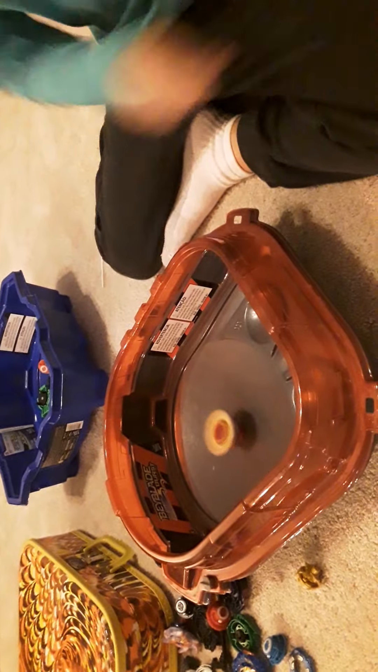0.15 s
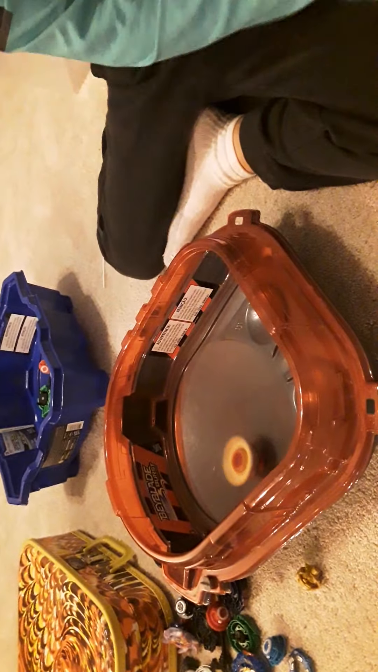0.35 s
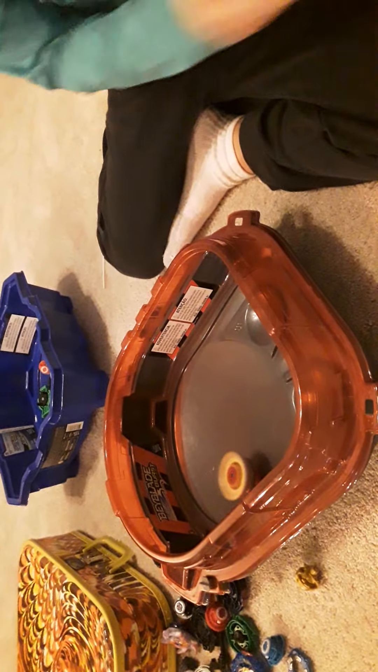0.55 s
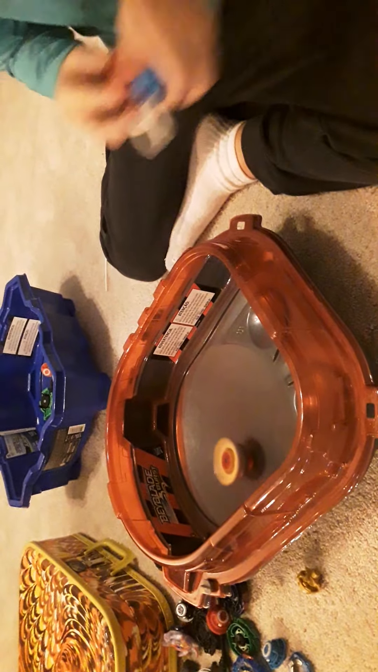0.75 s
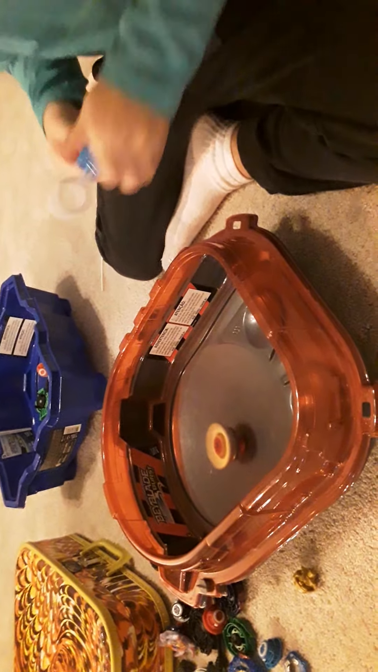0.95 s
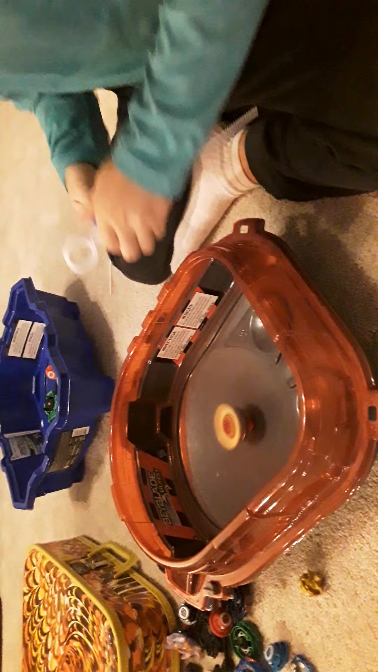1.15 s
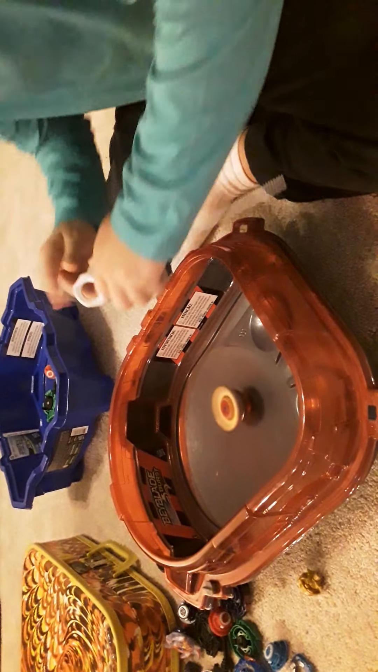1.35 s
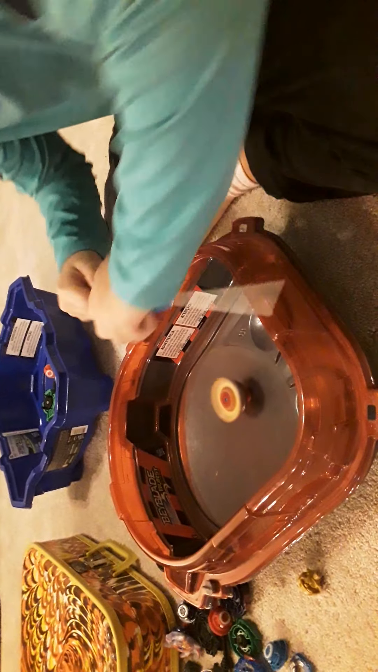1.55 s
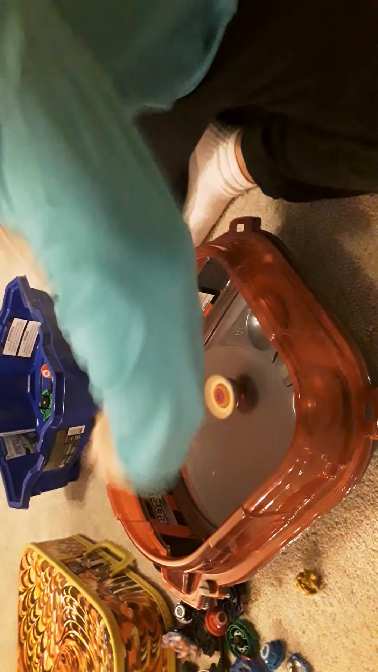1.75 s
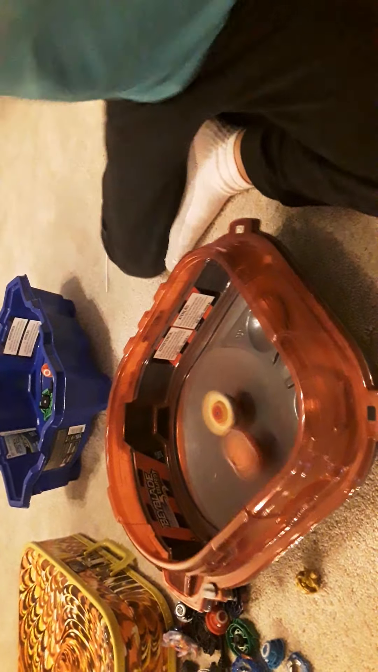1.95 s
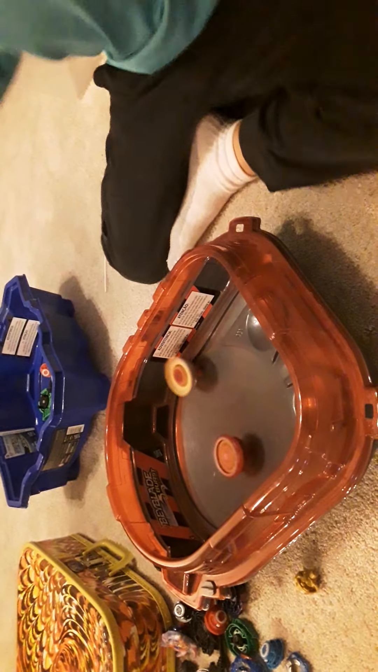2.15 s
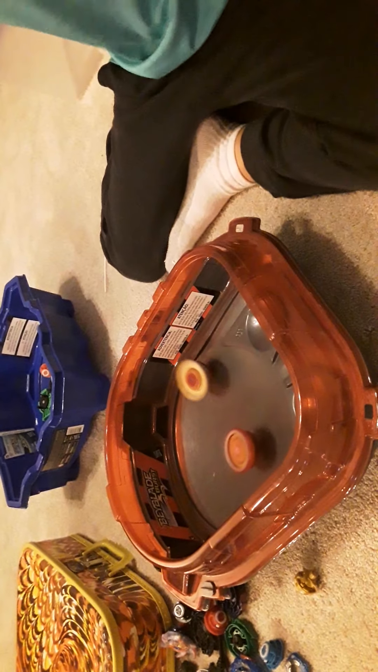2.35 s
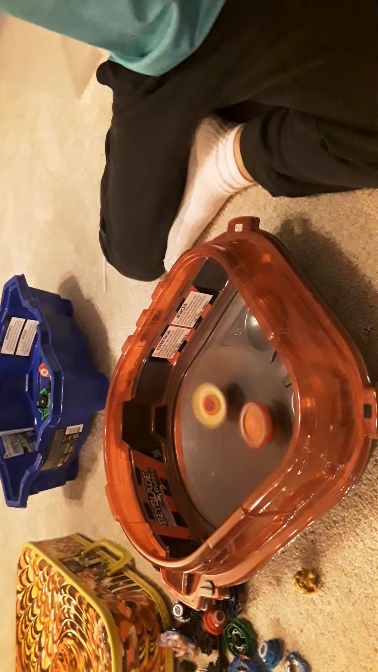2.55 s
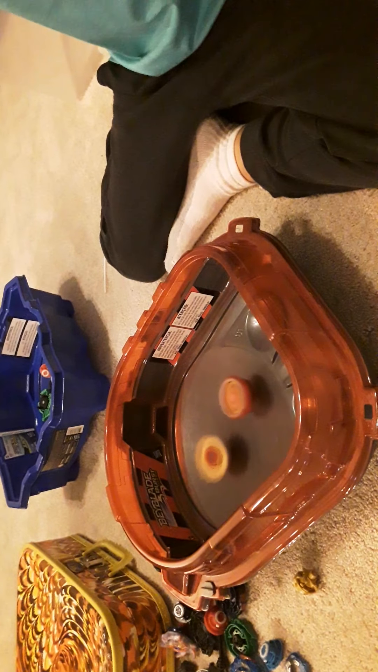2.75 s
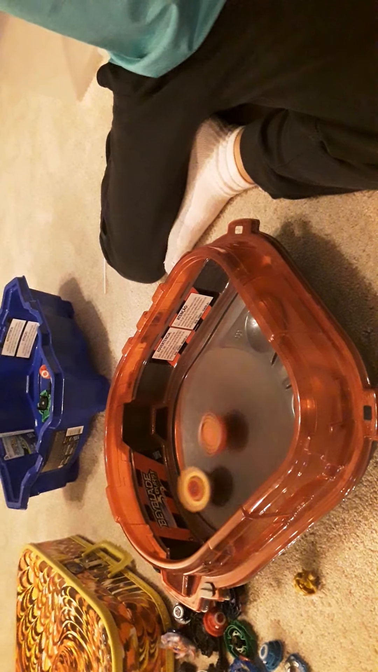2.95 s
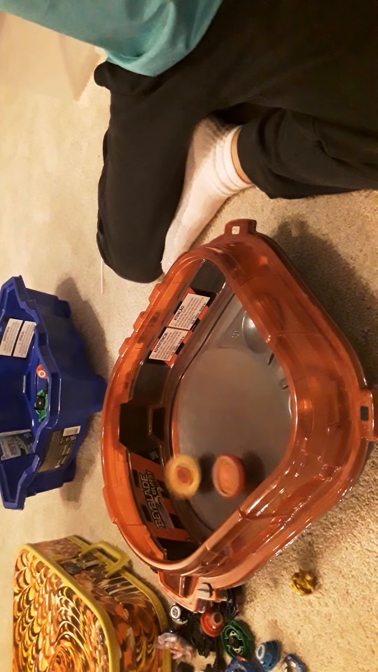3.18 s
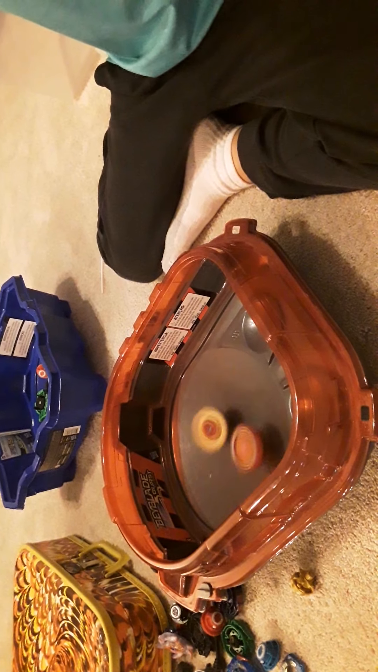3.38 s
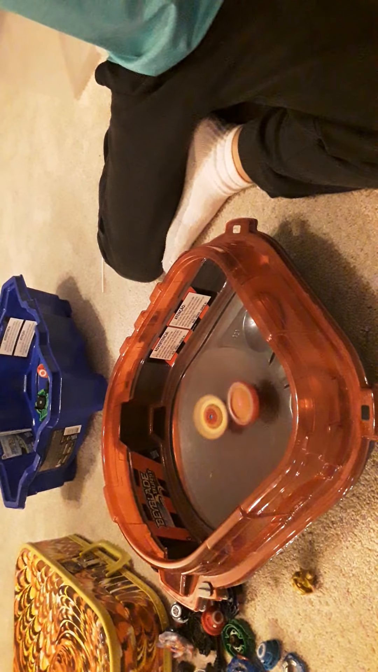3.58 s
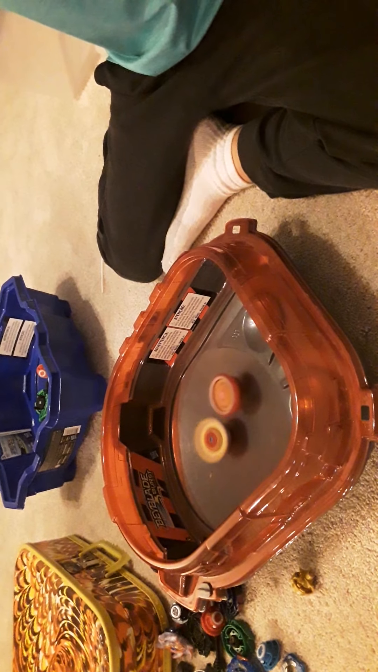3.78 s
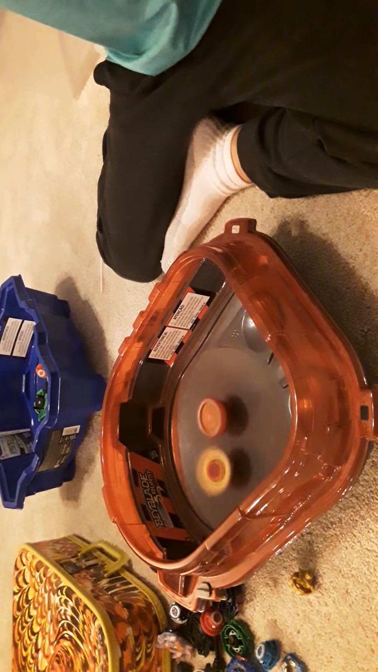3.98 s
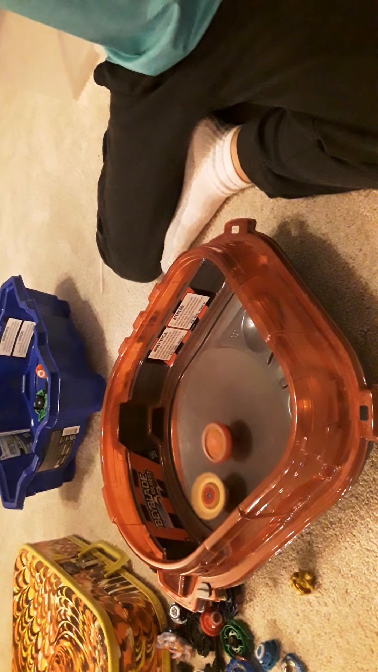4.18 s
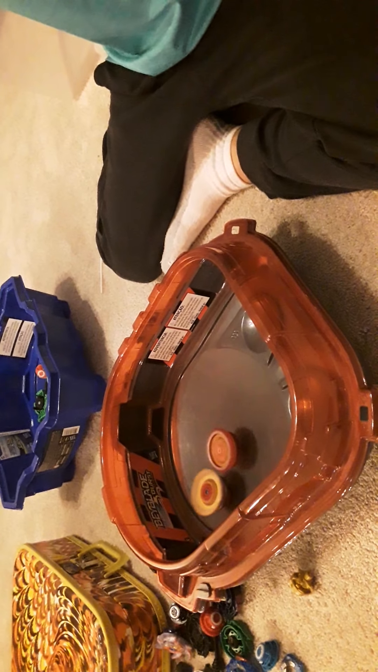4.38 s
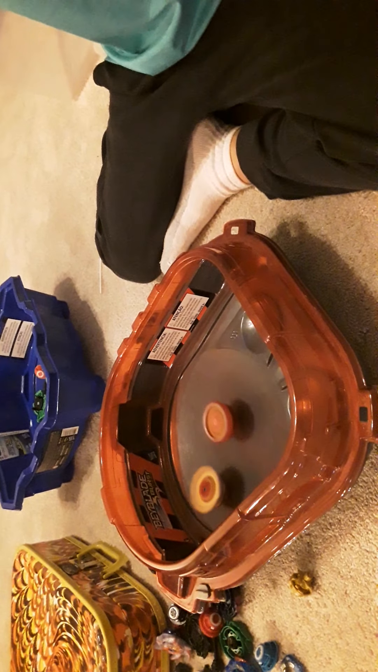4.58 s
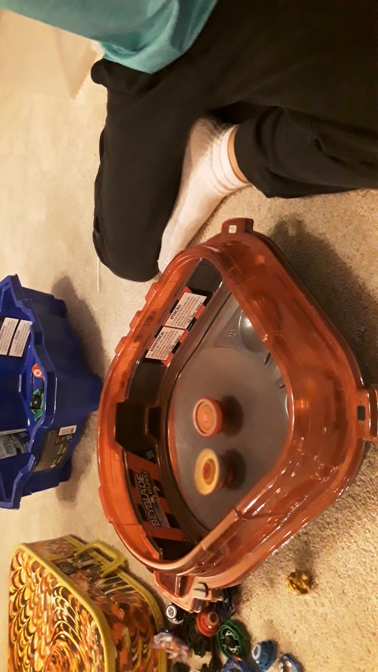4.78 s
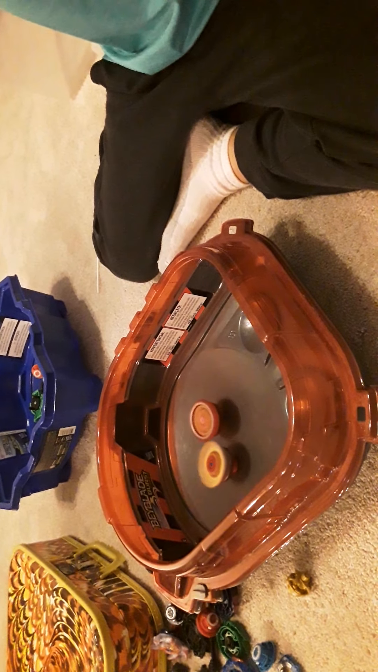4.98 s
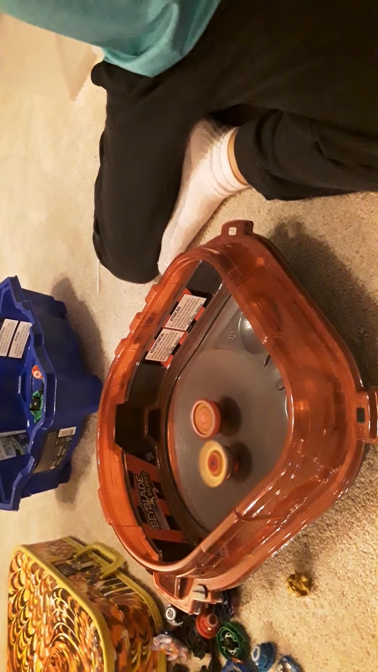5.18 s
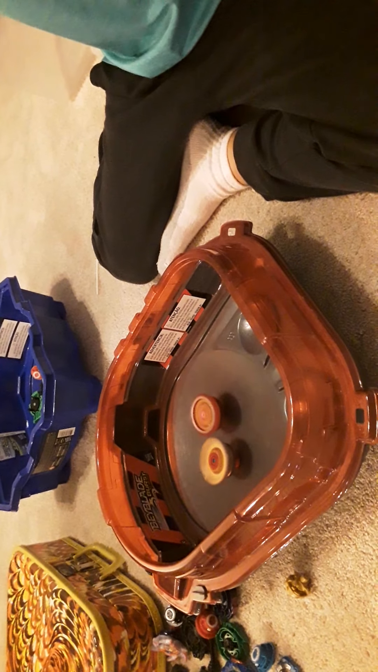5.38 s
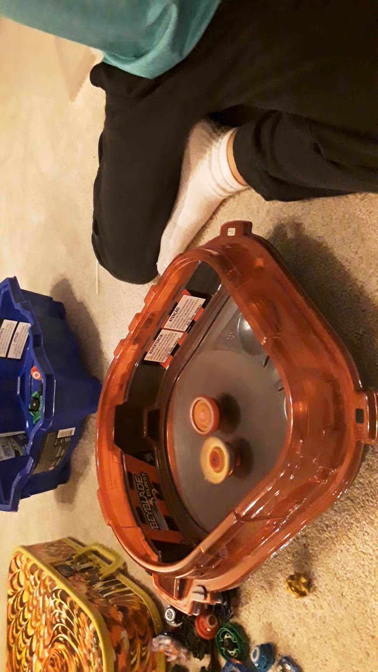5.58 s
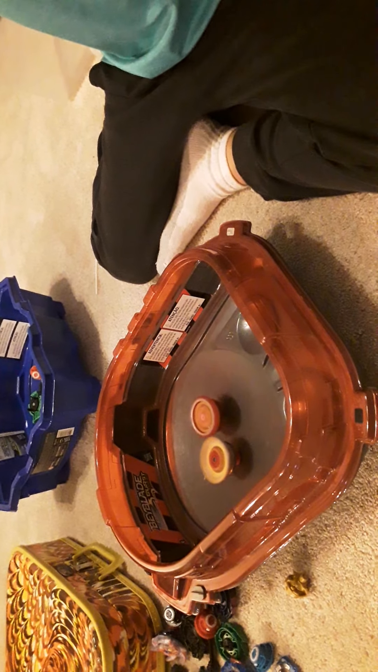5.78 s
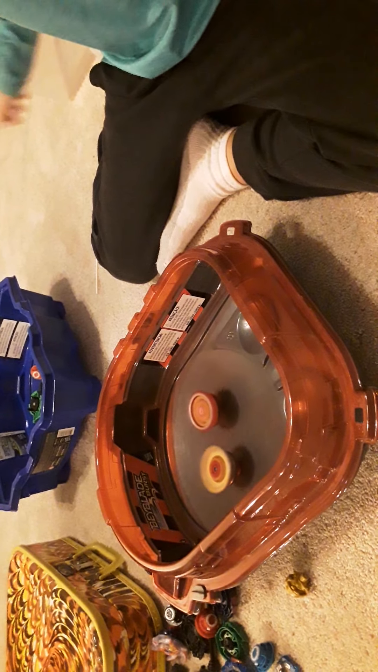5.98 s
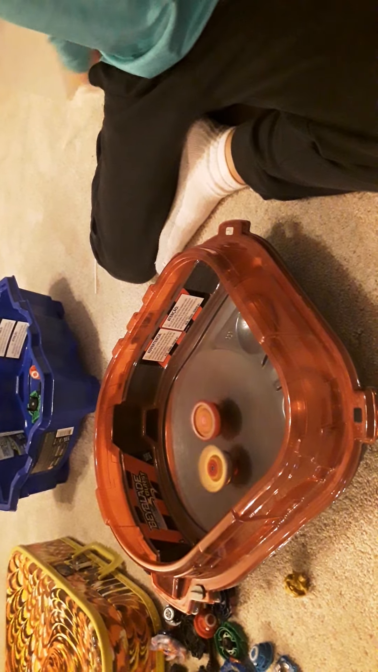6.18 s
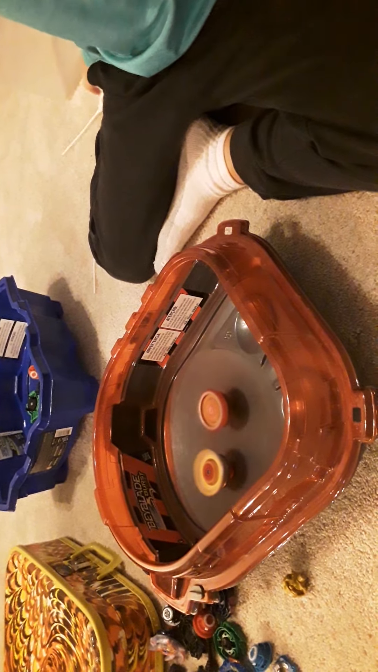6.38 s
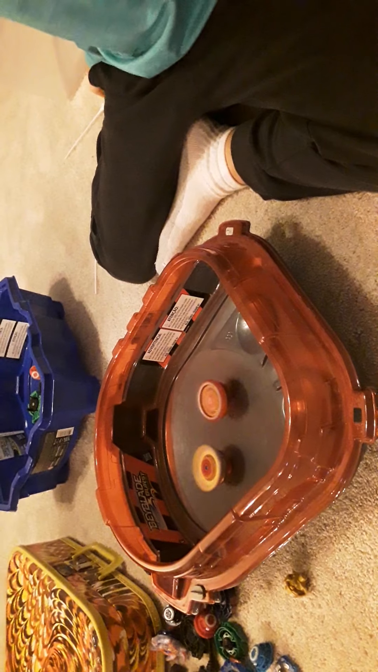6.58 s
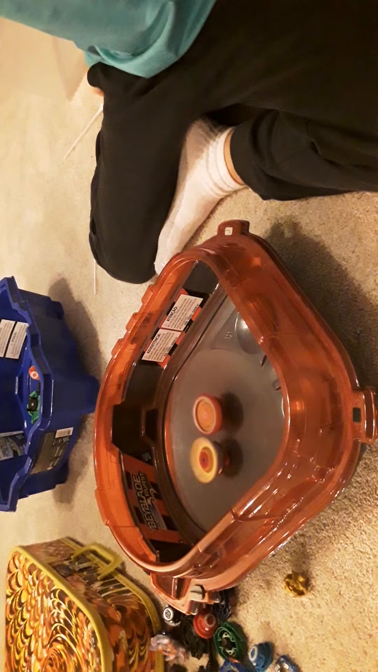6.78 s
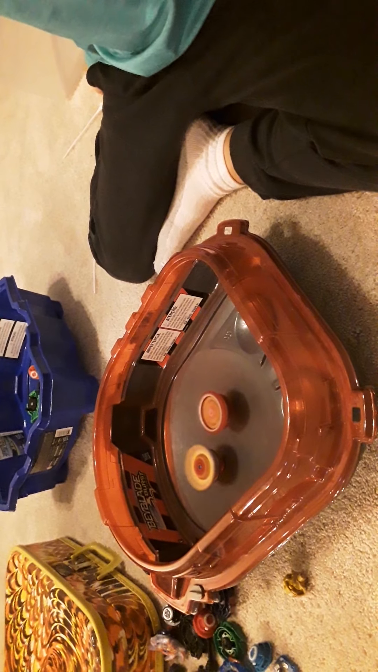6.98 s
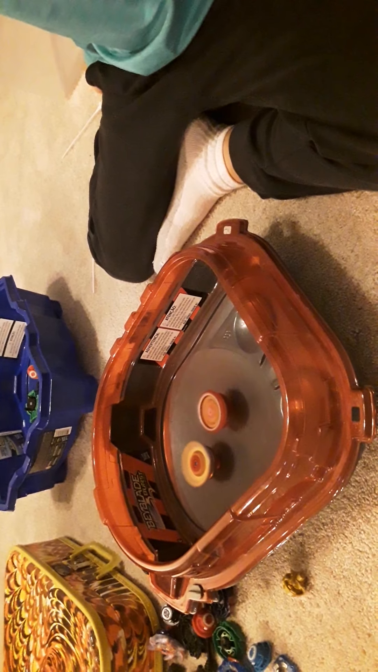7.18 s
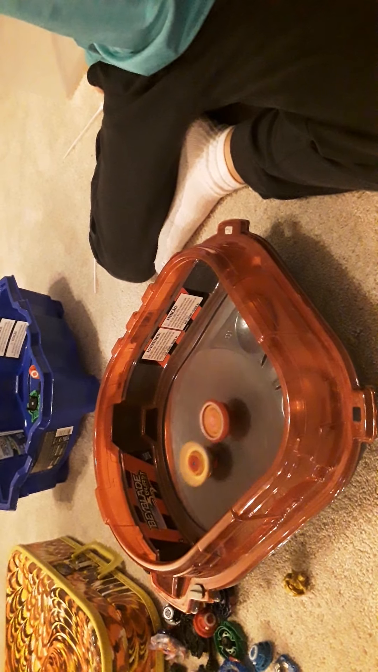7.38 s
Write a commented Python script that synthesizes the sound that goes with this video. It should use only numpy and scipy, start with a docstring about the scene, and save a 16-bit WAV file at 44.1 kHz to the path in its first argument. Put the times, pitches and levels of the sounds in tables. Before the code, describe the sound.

A toy top hums in a plastic bowl, then a launcher zips and a second top drops in, clashing sharply as both slow.

```python
"""In a small carpeted room, two toy spinning tops battle in a thin plastic arena, heard from above.
One top hums, rolls and ticks as its leaning rim touches down. The second is clicked onto a launcher,
spun up with a toothed rip cord and dropped in. The tops rattle along the wall and clash, more and more
rarely as they slow. The arena and the room ring after each clack."""
import sys
import numpy as np
from scipy import signal
from scipy.fft import rfft, irfft
from scipy.io import wavfile
from scipy.ndimage import uniform_filter1d

SR = 44100
rng = np.random.default_rng(int(sys.argv[2]) if len(sys.argv) > 2 else 0)


def wav_out(sig):
    """Save sig, one row per channel (or a flat mono array), as 16-bit PCM at SR to the path in sys.argv[1]."""
    wavfile.write(sys.argv[1], SR, np.round(np.clip(np.atleast_2d(sig).T, -1, 1) * 32767).astype(np.int16))


N = 327646
T = np.arange(N) / SR  # time of each sample [s]

# Levels in all tables are relative. Tilt adds treble, in dB per decade (a tenfold rise in pitch).
# the second top landing and bouncing: (time [s], level [dB], tilt [dB/decade], chatter [ms])
LANDING_BLOWS = [(1.9248, -9.5, 10, 8.5), (1.935, -21.5, -23.5, 3.2), (1.953, -16.5, -9, 4.7)]
# the tops hitting each other or the wall: (time [s], level [dB], tilt [dB/decade], chatter [ms])
CLASH_BLOWS = [(2.0216, 4, -3.5, 6.7), (2.658, -20.5, 7, 1.6), (2.75, -16.5, 0, 5), (2.824, -13.5, -0.5, 5),
               (2.835, -16, 6, 2.1), (3.037, -17.5, 5, 4.5), (3.0737, -2, -3, 3.9),
               (3.0812, 4.5, -2.5, 8.9), (3.173, -20, 6, 3), (3.2004, -8, -6, 2),
               (3.5575, -9.5, -2.5, 11.5), (3.5689, -6, -6, 4.7), (3.9854, -5.5, -2, 5.1),
               (4.107, -21.5, -11, 6.3), (4.4304, -9.5, -4.5, 7.3), (4.4596, -5.5, 0.5, 5),
               (4.4716, -3.5, -3.5, 7.9), (4.9116, -6.5, -4.5, 6.2), (4.9269, -16.5, -10, 18.5),
               (5.0251, -20, 0, 2.7), (5.037, -6, -3.5, 7.8), (5.054, -8, -2, 4.9), (5.0921, -15, -3, 4.8),
               (5.1765, -9.5, -2.5, 6.6), (5.236, -9, -0.5, 6.8), (5.3633, -10.5, -0.5, 6.9),
               (5.6088, -9, -4, 5.7), (5.839, -12, 1, 4.9), (5.852, -2.5, -5, 4.65), (6.2965, -19, -2, 4.2),
               (6.305, -4.5, -6.5, 3.04), (6.8555, -5, -7, 2.44), (7.413, -11, -3, 3.2)]
# tone of plastic rolling or shifting on plastic: (frequency [Hz], level [dB])
ROLL_TONE = [(60, -28), (130, -3), (230, -0.5), (400, -7.5), (800, -5), (1400, -7.5), (2700, -13.5),
             (4000, -17.5), (8500, -19.5), (15500, -46)]
# tone of the launcher's gears: (frequency [Hz], level [dB])
GEAR_TONE = [(88, -43.5), (150, -18), (341, -19), (494, -18.5), (689, -18.5), (774, -10.5), (979, -21.5),
             (4080, -16), (7770, -1), (11900, -12), (16000, -33.5)]
# tone of a top dropping on the dish, the arena's floor: (frequency [Hz], level [dB])
LANDING_TONE = [(80, -29), (200, -2), (420, -1.5), (620, -4), (802, 4), (950, -4.5), (1100, 0), (1400, -5),
                (2100, -7.5), (2650, -9), (4400, -18), (8200, -15.5), (16000, -38)]
# notes at which the launcher's body rings: (pitch [Hz], width [Hz], level [dB])
LAUNCHER_NOTES = [(2870, 150, 1.5), (5120, 410, -1.5), (8340, 180, -5.5)]


def undb(db):
    """Turn decibels into a factor to multiply by."""
    return 10 ** (np.asarray(db) / 20)


def unit(x):
    """Scale a signal to an average power of 1."""
    return x / np.sqrt(np.mean(x ** 2) + 1e-18)


def curve(rows, column=1):
    """One column of a table, joined by straight lines in time."""
    rows = np.array(rows)
    return np.interp(T, rows[:, 0], rows[:, column])


def add(out, start, x):
    """Mix x into out from a start time in seconds."""
    i = int(np.clip(start * SR, 0, N - 1))
    out[i:i + len(x)] += x[:N - i]


def swell(start, rise, fall, db, depth_db):
    """A gain that arches up by depth_db to a crest and down again, silent outside."""
    from_crest = T - start - rise
    away = np.where(from_crest < 0, -from_crest / max(rise, 1e-3), from_crest / max(fall, 1e-3))
    return (away <= 1) * undb(db - depth_db * np.minimum(away, 1) ** 2)


def colour(x, tone, tilt_db=0, size=2048):
    """Filter x to follow a tone table; white noise would keep its power."""
    hz, db = np.transpose(tone)
    decades = np.log10(np.maximum(np.fft.rfftfreq(size, 1 / SR), 10))
    gains = undb(np.interp(decades, np.log10(hz), db) + tilt_db * decades)
    # folding the second half onto the first makes the filter ring only after a hit
    cepstrum = irfft(np.log(gains))
    cepstrum[1:size // 2] *= 2
    cepstrum[size // 2 + 1:] = 0
    response = irfft(np.exp(rfft(cepstrum)))
    return signal.fftconvolve(x, response / np.linalg.norm(response))[:len(x)]


def resonate(x, notes):
    """An object shaken by x rings at its own notes; narrow ones ring longest."""
    return sum(undb(db) * signal.lfilter(*signal.iirpeak(hz, hz / width, fs=SR), x)
               for hz, width, db in notes)


def reflections(split_hz=9000):
    """Quick echoes from the arena and floor, then a short room tail whose treble dies first."""
    t = T[:SR // 2]

    def tail(noise, delay_s, fade_s):
        """Noise that starts after a delay and drops 60 dB in fade_s."""
        shape = (t > delay_s) * np.exp(-np.log(1000) * t / fade_s)
        return noise * shape / np.linalg.norm(shape)

    near, far = rng.standard_normal((2, len(t)))
    walls = np.arange(0, t[-1], .0015)  # the first echoes come in clumps, wall by wall
    near = unit(near * undb(4 * np.interp(t, walls, rng.standard_normal(len(walls)))))
    low = signal.sosfiltfilt(signal.butter(2, split_hz, fs=SR, output="sos"), far)
    room_tail = tail(low, .0083, fade_s=.53) + tail(far - low, .0083, fade_s=.2)
    return undb(-8) * (tail(near, .0059, fade_s=.17) + room_tail)


def room(x, echo_db):
    """A sound together with its echoes."""
    return x + undb(echo_db) * signal.fftconvolve(x, reflections())[:N]


def grit(per_s, spread_db):
    """Many tiny contacts of uneven size, at random times."""
    sizes = rng.choice([-1, 1], N) * undb(spread_db * rng.standard_normal(N))
    return unit(sizes * (rng.random(N) < per_s / SR))


def clacks(rows, tone, gain_db, attack_s, loose, loose_s, echo_db, uneven_db=3):
    """Each blow makes loose parts chatter briefly; it lands on a new spot, so it has its own echoes."""
    out, t = np.zeros(N), T[:SR // 2]
    contacts = np.arange(0, t[-1], .0008)
    for start, db, tilt_db, chatter_ms in rows:
        length = max(chatter_ms, .5) / 1000
        fade = np.exp(-(t / length) ** 3) + loose * np.exp(-t / loose_s)
        # the first contact has its full force; the rebounds after it vary
        scatter = np.interp(t, contacts, rng.standard_normal(len(contacts)))
        rebounds = undb(uneven_db * scatter * np.minimum(t / length, 1))
        burst = fade * (1 - np.exp(-t / attack_s)) * rebounds * rng.choice([-1, 1], len(t))
        echoes = undb(echo_db) * np.linalg.norm(burst) * reflections()
        add(out, start, undb(db + gain_db) * colour(burst + echoes, tone, tilt_db))
    return out


def rattles(rows, tone, per_s, gain_db, click_s=.0022):
    """Parts touch again and again in bursts of quick, uneven clicks."""
    out = np.zeros(N)
    for start, length, db in rows:
        t = np.arange(int((length + .008) * SR)) / SR
        gaps, sizes = rng.uniform(.6, 1.4, size=40), undb(3.5 * rng.standard_normal(40))
        times = (np.cumsum(gaps) - gaps[0]) / per_s
        clicks = sum(size * (t >= at) * np.exp(-abs(t - at) / click_s)
                     for at, size in zip(times, sizes) if at <= length)
        add(out, start, undb(db + gain_db) * unit(clicks) * np.sqrt(length * SR / len(t)))
    return colour(out * rng.choice([-1, 1], N), tone)


def spin(turns_per_s, since_s, drag=.0021):
    """A top's turns per second: air drag makes one turn take `drag` seconds longer every second."""
    return 1 / (1 / turns_per_s + drag * (T - since_s))


def room_air():
    """The quiet room's faint, steady rumble and hiss."""
    # tone of the background: (frequency [Hz], level [dB])
    tone = [(25, -26.5), (110, 9), (1000, -27.5), (4000, -30.5), (8000, -22), (15000, -48)]
    return undb(-67.5) * colour(rng.standard_normal(N), tone)


def rolling(speed, settle_s=4.77, fade_db_per_s=5.5, throb=.07):
    """The tips grind over the dish, throbbing twice a turn, and fade as the tops settle in the middle."""
    # a top swings out over the slope and rumbles louder: (time [s], rise [s], fall [s], level [dB])
    swings = [(-.2, 0.28, 0.06, -48), (.08, 0.14, 0.95, -42.5), (1.399, 0.15, 0.36, -56.5),
              (1.95, 0.12, 0.47, -39.5), (2.45, 0.35, 1, -38.5), (3.5, 0.34, 1, -49.5),
              (4.35, 0.11, 0.96, -51)]
    even_roll = undb(-67 - fade_db_per_s * np.maximum(T - settle_s, 0))
    swing_power = sum(swell(*swing, depth_db=31) ** 2 for swing in swings)
    strength = undb(-2) * np.sqrt(even_roll ** 2 + swing_power)
    turns = np.cumsum(speed) / SR
    grind = grit(per_s=1400, spread_db=4.3) * (1 + throb * np.cos(4 * np.pi * turns))
    return colour(grind * strength, ROLL_TONE)


def humming():
    """A wobble shakes the dish twice a turn; the uneven dish makes the hum waver, high notes most."""
    # hum of whichever top wobbles most, at twice its spin: (time [s], pitch [Hz], level [dB])
    wobble = [(.15, 100.9, -52.5), (.33, 110.7, -43.5), (1.1, 97.7, -55), (1.7, 92.7, -54),
              (2.3, 89.5, -54.5), (2.5, 96, -54.5), (2.8, 90, -40.5), (3.4, 84.8, -59), (4.6, 73.7, -61.5),
              (7.4, 59.1, -77.5)]
    # the notes in that hum: (multiple of the spin, level [dB])
    partials = [(2, 2), (3, -10), (4, -7), (6, -9.5), (8, -14)]
    turns = np.cumsum(curve(wobble) / 2) / SR
    knots = np.arange(0, T[-1], .05)
    hum = 0
    for multiple, db in partials:
        real, imag = (np.interp(T, knots, row) for row in rng.standard_normal((2, len(knots))))
        waver = 1 + .25 * multiple * (real + 1j * imag)  # nudges both level and pitch
        note = np.exp(2j * np.pi * (multiple * turns + rng.random()))
        hum = hum + undb(db) * unit(np.real(waver * note))
    return unit(hum) * undb(curve(wobble, column=2))


def rim_ticks(speeds, contact_s=.0033, far_side_db=-13, scatter_db=1.5):
    """A leaning rim touches once a turn, its far side more weakly; a slow top gives a thin whirr."""
    # a top leans for a while: (time [s], which top, rise [s], fall [s], level [dB])
    leans = [(0.015, "first", 0.00089, 0.081, -47.5), (0.1486, "first", 0.07, 0.03, -49),
             (0.243, "first", 0.053, 0.18, -31), (.4555, "first", 0.0087, 0.46, -35),
             (1.165, "first", 0.036, 0.13, -48.5), (1.448, "first", 0.26, .03, -52),
             (2.169, "first", 0.061, 0.051, -45.5), (2.3743, "first", 0.0033, 0.13, -49.5),
             (2.492, "first", 0.33, 0.027, -42), (2.991, "second", 0.032, 0.12, -35.5),
             (3.458, "first", 0.0011, 0.11, -43), (3.789, "first", 0.1, 0.082, -46.5),
             (4.221, "second", 0.017, 0.28, -56), (4.653, "second", 0.037, 0.13, -49.5),
             (4.705, "second", 0.06, 0.19, -50.5), (6.083, "first", 0.0063, 0.38, -64),
             (6.525, "first", 0.087, 0.17, -59)]
    # tone of a fast top's tick: (frequency [Hz], level [dB])
    tone = [(1000, -29.5), (3000, -19), (6000, -20.5), (7900, -5), (8700, -8), (9600, -3), (10800, -14),
            (15500, -37)]
    # thin ringing of a slow top's rim: (pitch [Hz], width [Hz], level [dB])
    whirr_notes = [(2850, 130, 0), (7150, 150, 14.5), (7767, 91, 19.5), (10400, 400, 2.5)]
    hard, soft = np.zeros((2, N))
    for start, top, rise, fall, db in leans:
        speed = speeds[top]
        turns = np.cumsum(speed * (T >= start)) / SR
        sizes = undb(scatter_db * rng.standard_normal(1000) + far_side_db * (np.arange(1000) % 2))
        touches = np.exp(-(turns % .5 / speed / contact_s) ** 2) / np.sqrt(speed * contact_s / 2)
        ticks = sizes[(2 * turns).astype(int)] * touches * swell(start, rise, fall, db, depth_db=14.5)
        hardness = np.interp(speed, [31, 37], [0, 1])  # all whirr below 31 turns a second
        hard += ticks * hardness
        soft += ticks * (1 - hardness)
    grain = rng.choice([-1, 1], N)
    lowpass = signal.butter(4, 11000, fs=SR, output="sos")
    whirr = signal.sosfilt(lowpass, resonate(soft * grain, whirr_notes))
    return colour(hard * grain, tone) + undb(-1) * whirr


def snapping():
    """The launcher's catch clicks, or a rim nicks the wall: sharp plastic snaps that ring briefly."""
    # the snaps: (time [s], level [dB], tilt [dB/decade], chatter [ms])
    blows = [(0.0536, -21.5, 24, 6.4), (0.2448, -3.5, 10, 4.8), (0.9672, 5, 29, 2.8),
             (0.9975, -1.5, 23.5, 9.9), (1.0307, 7.5, 18.5, 2.15), (1.0802, 4, 10, 3.97),
             (1.257, -24, 11, 4.6), (1.684, -18, 2.5, 7.3), (1.7575, -2.5, 10, 2.6), (1.7932, 13, 35, 0.9)]
    # tone of a snap: (frequency [Hz], level [dB])
    tone = [(120, -56.5), (200, -16.5), (409, -21.5), (465, -36.5), (821, -9.5), (1350, -23), (2910, -2.5),
            (3490, -10.5), (5500, -5.5), (7300, -0.5), (8300, -1), (10100, -16), (11700, -11), (16000, -34)]
    snaps = clacks(blows, tone, gain_db=-12.5, attack_s=.0012, loose=.22, loose_s=.004, echo_db=-2.5)
    return snaps + resonate(snaps, LAUNCHER_NOTES)


def rubbing():
    """The first top slides along the slope, plastic on plastic: a fine, gritty hiss."""
    # strength of the rub: (time [s], level [dB])
    rub = [(.23, -81), (.25, -41.5), (.42, -36), (.6, -41), (.8, -47.5), (.88, -75.5)]
    # tone of the hiss: (frequency [Hz], level [dB])
    tone = [(880, -69), (1500, 5.5), (3500, -6.5), (5540, 7), (9600, 1.5), (13500, -10), (16000, -34)]
    touching = uniform_filter1d(1. * ((T > rub[0][0]) & (T < rub[-1][0])), size=600)
    return colour(grit(per_s=5000, spread_db=2.5) * touching * undb(curve(rub) - 1), tone)


def fingers():
    """Fingers shift on the hollow launcher and make it rattle softly."""
    # finger movements: (time [s], length [s], level [dB])
    moves = [(.92, 0.042, -45.5), (.978, 0.0055, -35.5), (1.01, 0.041, -41), (1.18, 0.069, -48)]
    return rattles(moves, ROLL_TONE, per_s=290, gain_db=2.5)


def rip_cord(scrape_db=-1, body_db=9):
    """The cord's teeth flick the launcher's gear ever faster: a rising zip, each tooth scraping."""
    # the pull on the cord: (time [s], speed [teeth/s], level [dB])
    pull = [(1.69, 175, -48), (1.725, 400, -38.5), (1.745, 700, -24.5), (1.76, 1100, -23),
            (1.775, 1200, -20), (1.792, 1170, -28.5)]
    hz = curve(pull)
    phase = np.cumsum(hz) / SR % 1
    flicks = unit(np.sinc((phase - .5) * SR / hz) / np.sqrt(hz))
    scrape = unit(np.exp(-((phase + .5) % 1) / .5)) * rng.standard_normal(N)
    teeth = unit(flicks + undb(scrape_db) * scrape)
    pulling = (T > pull[0][0]) & (T < pull[-1][0])
    zipping = colour(teeth * pulling * undb(curve(pull, column=2) - 4), GEAR_TONE)
    return zipping + undb(body_db) * resonate(zipping, LAUNCHER_NOTES)


def gears_stopping():
    """The launcher's gears slam to a stop and rattle."""
    # three fading jolts: (time [s], length [s], level [dB])
    jolts = [(1.795, 0.026, -8), (1.819, 0.034, -17.5), (1.853, 0.045, -24)]
    return rattles(jolts, GEAR_TONE, per_s=380, gain_db=-.5)


def thumps(fade_cycles=.18, gain_db=-14):
    """A heavy blow pushes out one low swing that dies at once."""
    # the heaviest blows: (time [s], level [dB], pitch [Hz])
    blows = [(1.796, 6.5, 135), (2.0261, 1, 145), (3.082, -8.5, 89.5), (6.855, -9, 97.6)]
    # tone of a dull thump: (frequency [Hz], level [dB])
    tone = [(20, -29.5), (60, -4), (130, 0), (300, 0), (600, 5.5), (2000, -28.5)]
    out, t = np.zeros(N), T[:SR // 10]
    for start, db, hz in blows:
        add(out, start, undb(db + gain_db) * np.sin(2 * np.pi * hz * t) * np.exp(-hz * t / fade_cycles))
    return colour(out, tone)


def landing():
    """The second top drops onto the dish and bounces."""
    return clacks(LANDING_BLOWS, LANDING_TONE, gain_db=-2,
                  attack_s=.00098, loose=.32, loose_s=.01, echo_db=3.5)


def clashing(rim_db=-9):
    """The tops knock together or hit the wall: their rims ring and the dish booms under them."""
    # tone of a knock: (frequency [Hz], level [dB])
    tone = [(35, -92), (60, -23), (180, -8.5), (553, -24), (1040, -11.5), (1200, -20.5), (1620, -11),
            (1950, -20.5), (2190, -9), (2840, -8.5), (4220, -11), (6430, 0), (7570, 5), (12100, 1),
            (16000, -19.5)]
    # ringing of a rim: (pitch [Hz], width [Hz], level [dB])
    rim_notes = [(2970, 110, 5), (7300, 120, 2.5), (7890, 480, 3.5), (11100, 200, -2)]
    # low boom of the dish: (pitch [Hz], width [Hz], level [dB])
    dish_notes = [(109, 13, 3.3)]
    knocks = clacks(CLASH_BLOWS, tone, gain_db=-7.7, attack_s=.0006, loose=.1, loose_s=.01, echo_db=-2.5)
    return knocks + undb(rim_db) * resonate(knocks, rim_notes) + resonate(knocks, dish_notes)


def hops(first_gap_s=.012, shrink=.7, hop_db=-24, step_db=-3, tap_s=.0018):
    """A clash kicks a top off its tip; it hops three times, the hops getting shorter and weaker."""
    out, t = np.zeros(N), T[:SR // 100]
    for when, db, _, _ in CLASH_BLOWS:
        gap = first_gap_s
        for hop in range(3):
            when += gap * (1 + .1 * rng.standard_normal())
            tap = np.exp(-t / tap_s) * rng.choice([-1, 1], len(t))
            add(out, when, tap * undb(db + hop_db + hop * step_db + 2 * rng.standard_normal()))
            gap *= shrink
    return room(colour(out, LANDING_TONE, tilt_db=19.5), echo_db=1.5)


def wall_grinding():
    """A rim drags along the wall: an unbroken rumble that the bowl makes hollow."""
    # a circling top stays pressed to the wall: (time [s], rise [s], fall [s], level [dB])
    runs = [(2.62, 0.34, 0.41, -37), (3.295, 0.032, 0.042, -44)]
    # hollow note of the bowl: (pitch [Hz], width [Hz], level [dB])
    bowl_notes = [(223.4, 63, 7.5)]
    pressure = sum(swell(*run, depth_db=27.5) for run in runs)
    grind = colour(grit(per_s=6000, spread_db=1) * pressure, ROLL_TONE)
    return grind / 2 + resonate(grind, bowl_notes)


def skittering():
    """A rim skips along the wall in evenly spaced, rattling bounces that grow or fade."""
    # rows of bounces: (time [s], count, gap [s], contact [s], first level [dB], step per bounce [dB])
    skips = [(2.654, 4, 0.03, 0.019, -35, 2), (2.848, 2, 0.02, 0.02, -22.5, -1),
             (2.896, 2, 0.051, 0.032, -21, -1), (3.012, 2, 0.022, 0.0055, -22.5, 1),
             (3.144, 2, 0.075, 0.009, -15, -9), (3.302, 3, 0.028, 0.026, -23.5, -3),
             (3.839, 3, 0.033, 0.0039, -41, 6.5), (4.006, 3, 0.044, 0.031, -29, -1.5)]
    # tone of the rattle: (frequency [Hz], level [dB])
    tone = [(53, -48), (90, -2.5), (139, -14.5), (224, -3), (438, -4), (510, -26), (769, -1.5), (858, -10),
            (1020, -7), (2040, -15.5), (2710, -5), (4450, -17), (7820, 2), (12300, -12.5), (16000, -35)]
    bounces = [(start + k * gap, contact, db + k * step_db)
               for start, count, gap, contact, db, step_db in skips for k in range(count)]
    return rattles(bounces, tone, per_s=370, gain_db=-2)


def discs_ringing():
    """The tops' metal discs ring on; each strike shares its force among their notes differently."""
    # clashes that land metal on metal: (time [s], level of disc 0 [dB], level of disc 1 [dB])
    strikes = [(3.082, -27, -23), (4.475, -34, -36), (4.915, -23, -31), (5.61, -42, -37), (5.855, -42, -28),
               (6.304, -30, -35)]
    # notes of the discs: (which disc, pitch [Hz], level [dB], time to fade by 60 dB [s])
    notes = [(0, 7418, -8, .2), (0, 10300, 0, .15), (0, 10520, -3, .16), (1, 7670, -8, .3),
             (1, 11720, -4, .2), (1, 11920, 0, .22)]
    out, t = np.zeros(N), T[:SR // 2]
    for start, *disc_db in strikes:
        for disc, hz, db, fade_s in notes:
            size = undb(disc_db[disc] + db + 2 * rng.standard_normal())
            add(out, start, size * np.sin(2 * np.pi * hz * t) * np.exp(-np.log(1000) * t / fade_s))
    return out


def squeaking(speed, slip_s=.0046, far_side_db=-2):
    """The tip slips with a short squeak twice a turn, once strongly and once weakly."""
    # the second top drifts down the slope: (time [s], rise [s], fall [s], level [dB])
    drifts = [(4.226, 0.1, 0.13, -53), (4.606, 0.13, 0.2, -50)]
    # notes of the squeak: (pitch [Hz], width [Hz], level [dB])
    notes = [(2300, 200, -2), (2850, 550, 3)]
    slips = np.zeros(N)
    for start, rise, fall, db in drifts:
        phase = np.cumsum(speed * (T >= start)) / SR % 1
        slip = np.exp(-(phase % .5 / speed / slip_s) ** 2) * undb(far_side_db * (phase >= .5))
        slips += slip / np.sqrt(speed * slip_s) * swell(start, rise, fall, db, depth_db=7)
    squeaks = resonate(slips * rng.standard_normal(N), notes)
    return squeaks / np.std(resonate(rng.standard_normal(N), notes))


def arena_shell(x, ring_db=-3):
    """The arena's thin shell adds its own ringing to a sound."""
    # notes of the shell: (pitch [Hz], width [Hz], level [dB])
    notes = [(532, 12, -4), (790, 16, -1), (1049, 23, 3), (1254, 9.5, -3), (2360, 10, 5.5), (2754, 110, -8),
             (2870, 16, 2.5), (5850, 12, 0.5)]
    return x + undb(ring_db) * resonate(x, notes)


def scene():
    """Two tops and a launcher at the arena, in a quiet room."""
    braking = np.where(T < 4.46, 1, .815)  # a triple clash slows the second top
    speeds = {"first": spin(56.2, since_s=0), "second": spin(50, since_s=LANDING_BLOWS[0][0]) * braking}
    contact = skittering() + wall_grinding() + rolling(speeds["first"])
    contact += rubbing() + squeaking(speeds["second"])
    running = room(contact, echo_db=-5.5) + room(rim_ticks(speeds), echo_db=-7)
    tops = clashing() + discs_ringing() + hops() + running + landing()
    launcher = snapping() + room(gears_stopping() + fingers() + rip_cord(), echo_db=-1.5)
    return (room_air() + arena_shell(tops + thumps()) + humming() + launcher)[None]


def record(dry, cutoff_hz=15850):
    """The microphone rounds off the loudest peaks and cuts the highest treble."""
    rounded = dry / (1 + dry ** 4) ** (1 / 4)
    return signal.sosfilt(signal.ellip(8, .2, 70, cutoff_hz, fs=SR, output="sos"), rounded)


dry = scene()
out = record(dry)
wav_out(out)
```